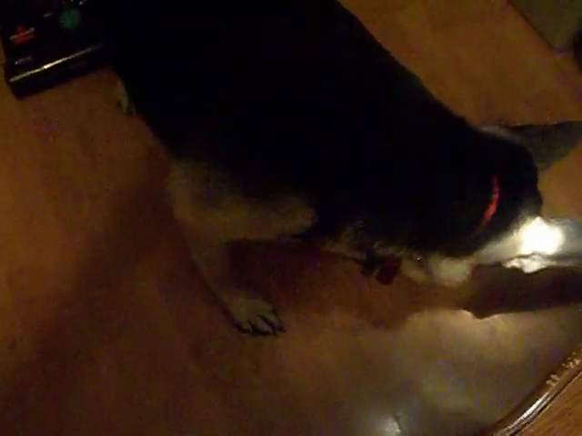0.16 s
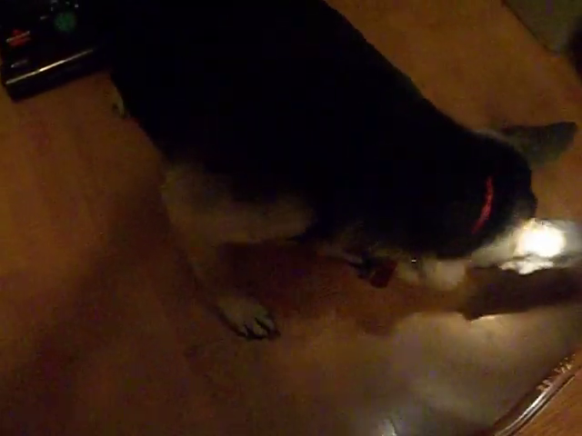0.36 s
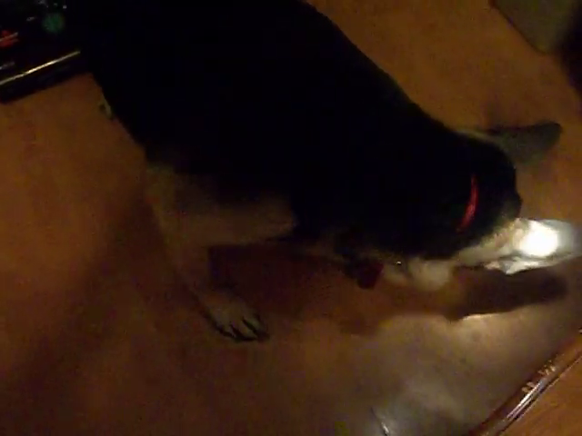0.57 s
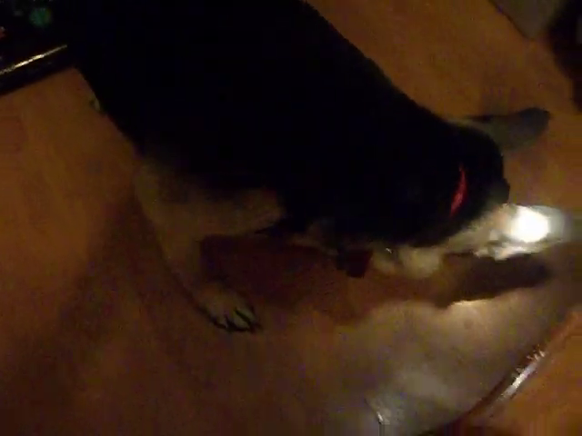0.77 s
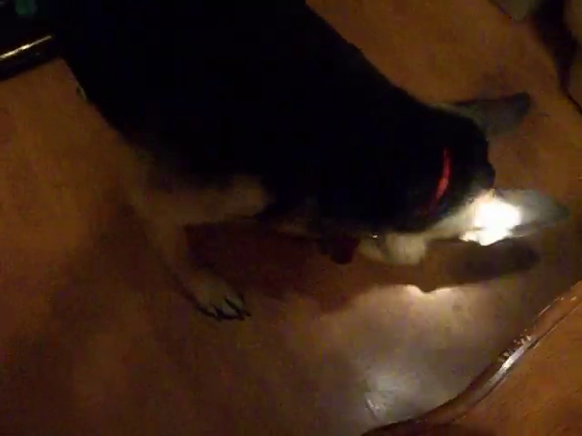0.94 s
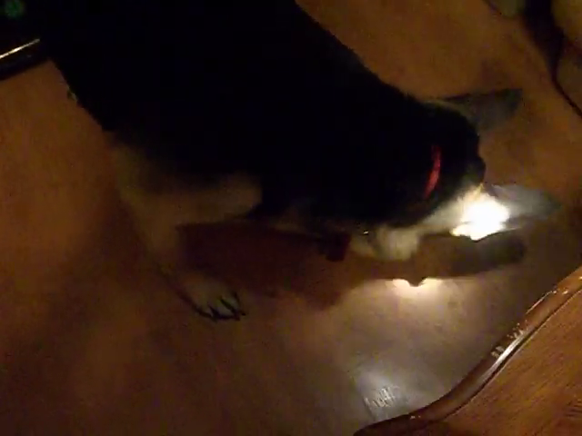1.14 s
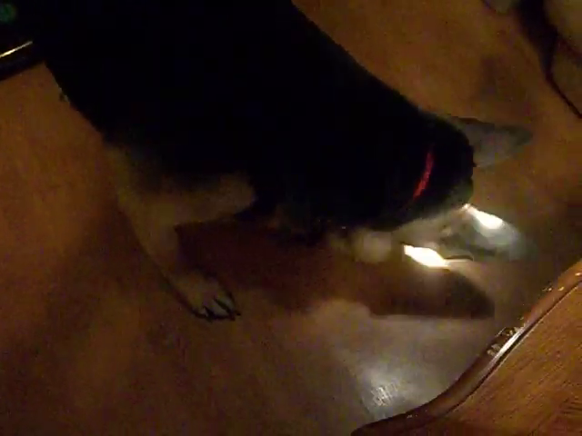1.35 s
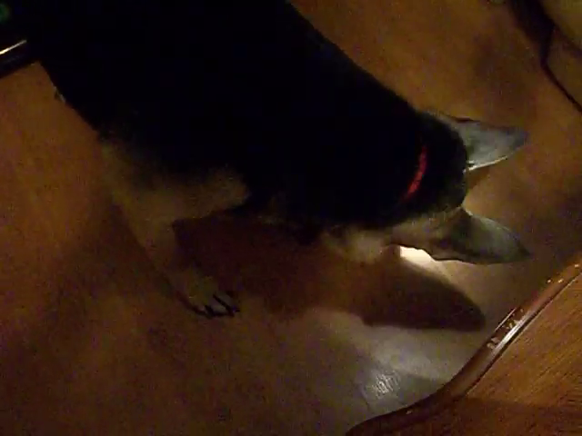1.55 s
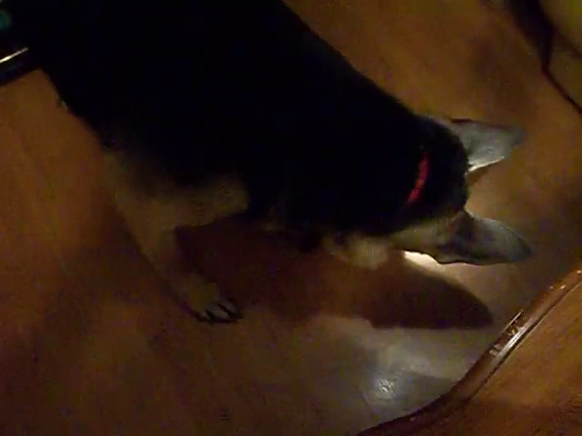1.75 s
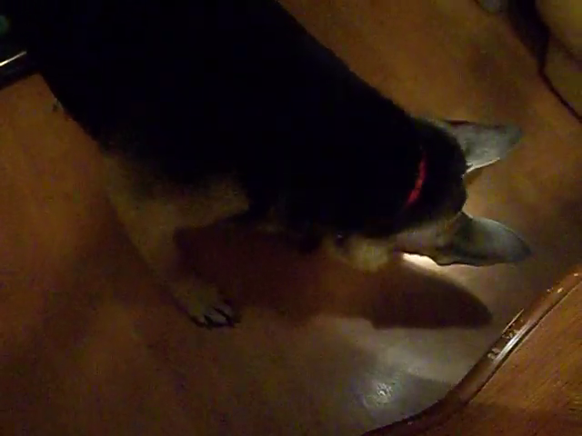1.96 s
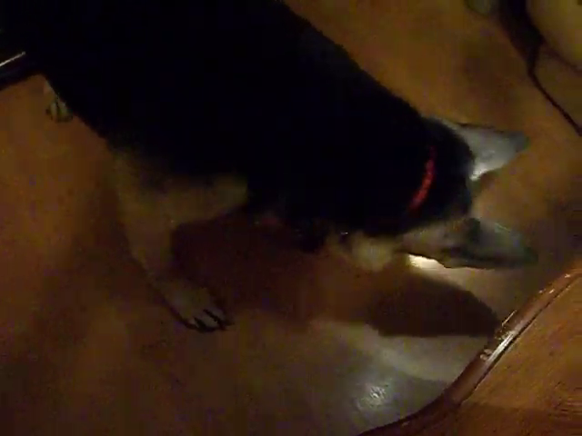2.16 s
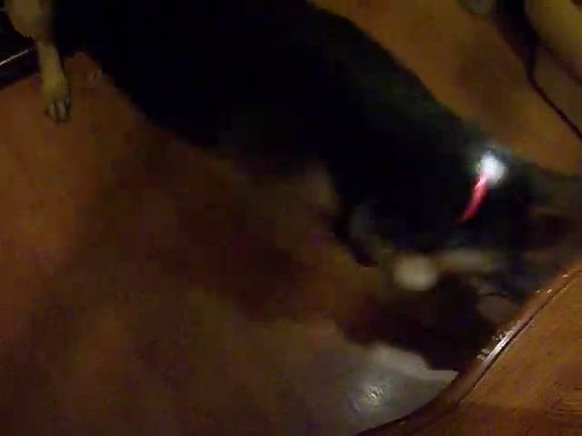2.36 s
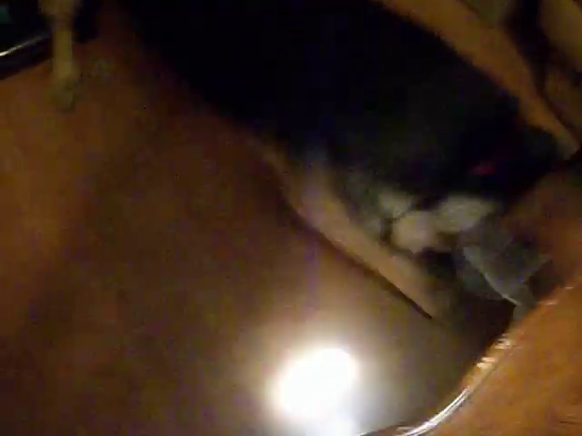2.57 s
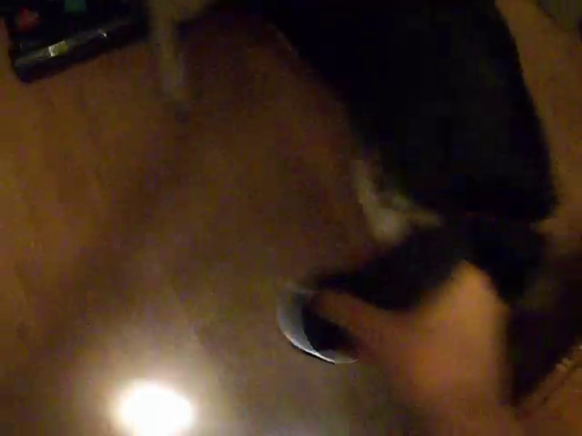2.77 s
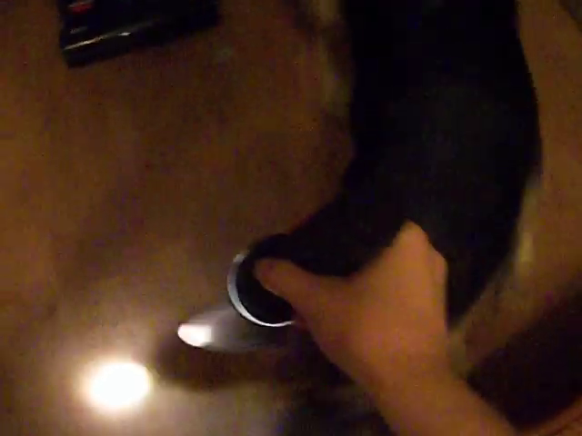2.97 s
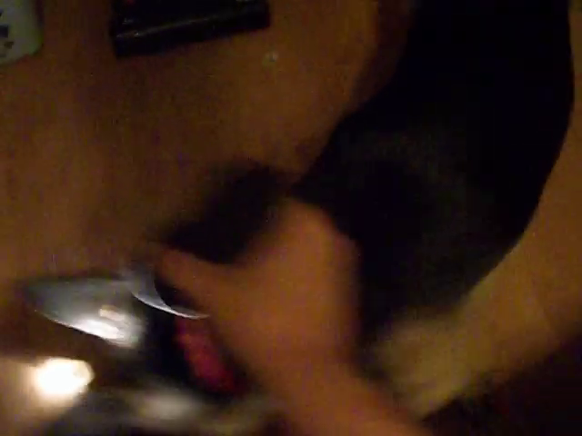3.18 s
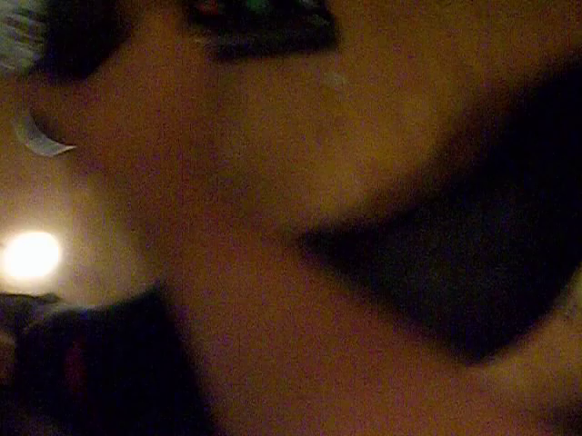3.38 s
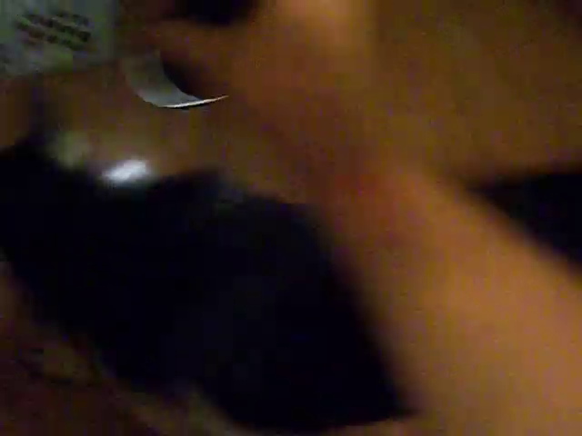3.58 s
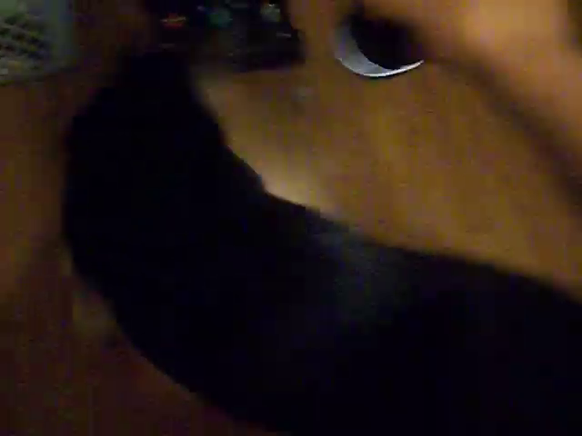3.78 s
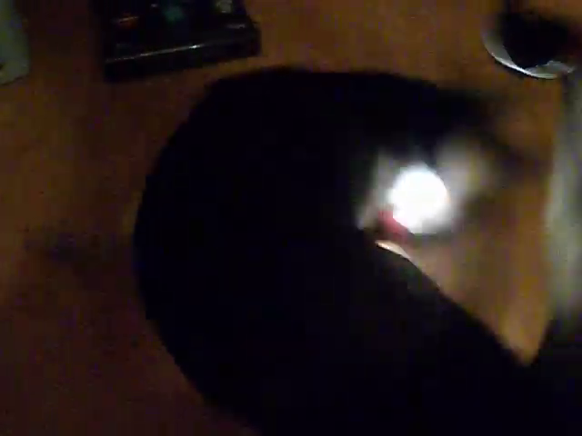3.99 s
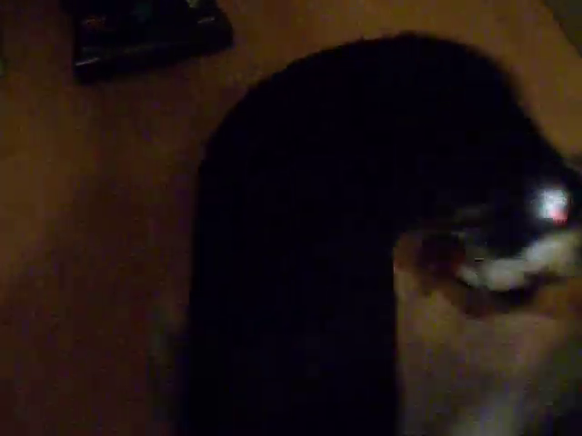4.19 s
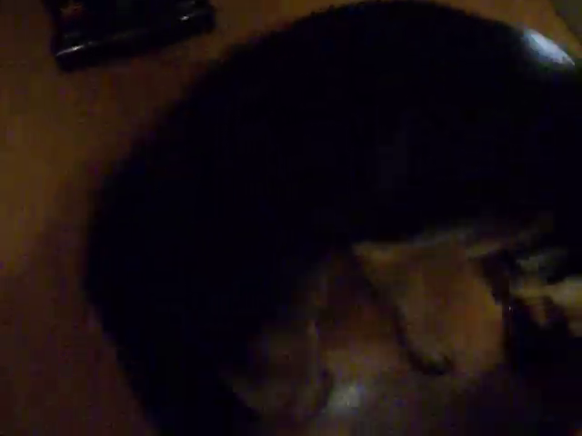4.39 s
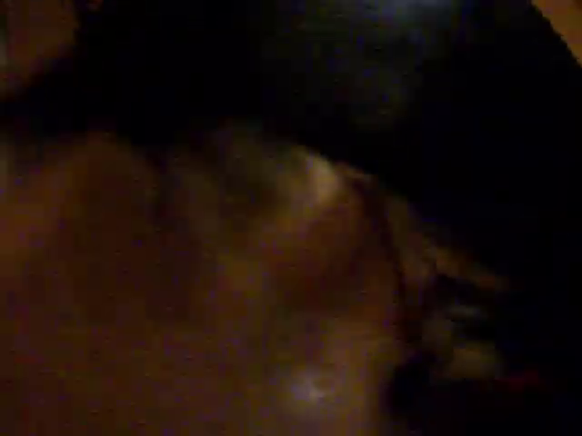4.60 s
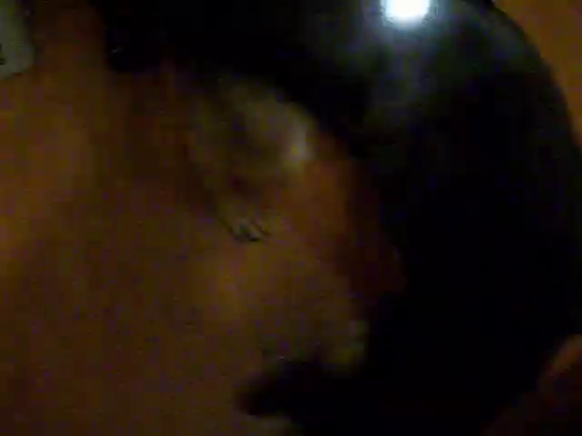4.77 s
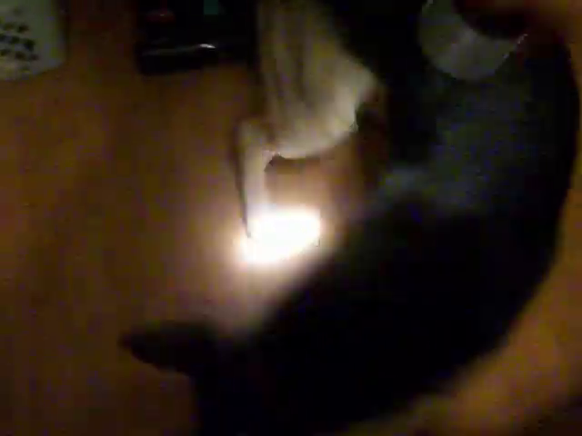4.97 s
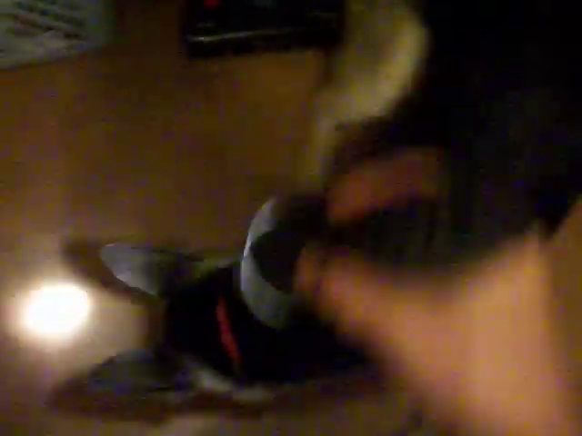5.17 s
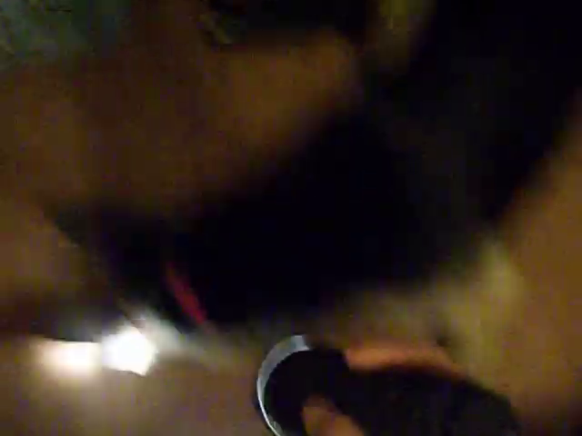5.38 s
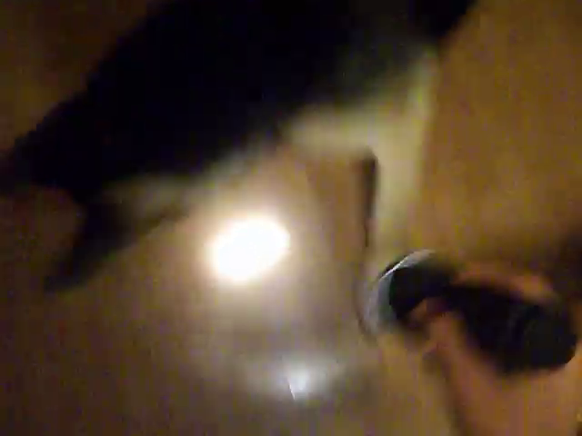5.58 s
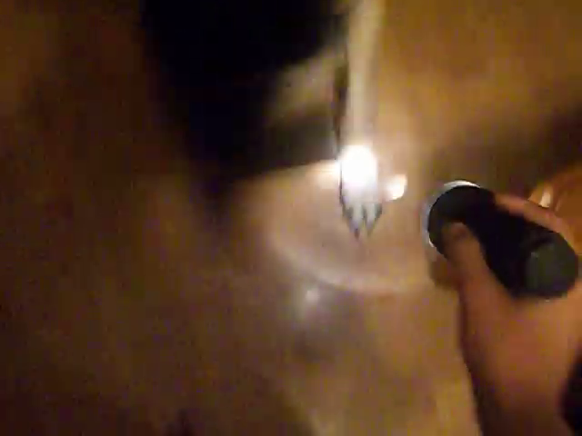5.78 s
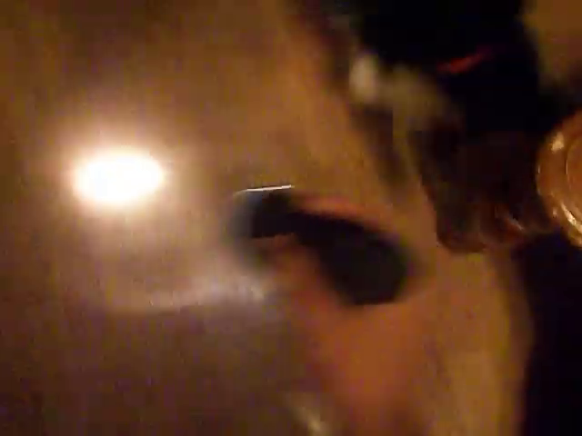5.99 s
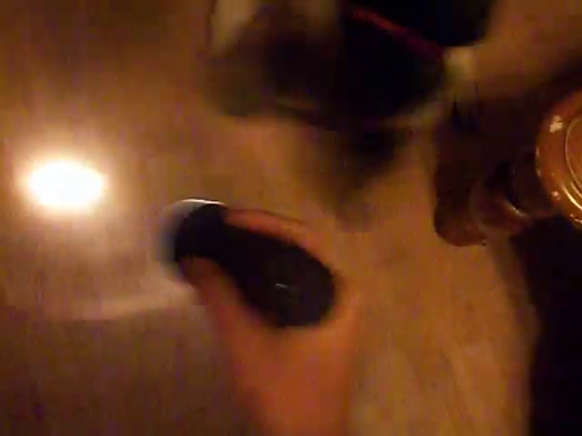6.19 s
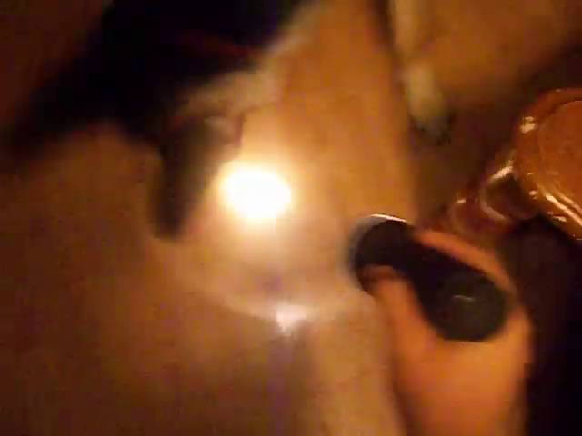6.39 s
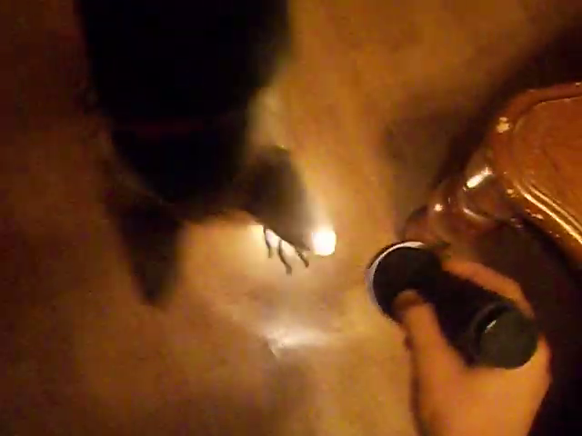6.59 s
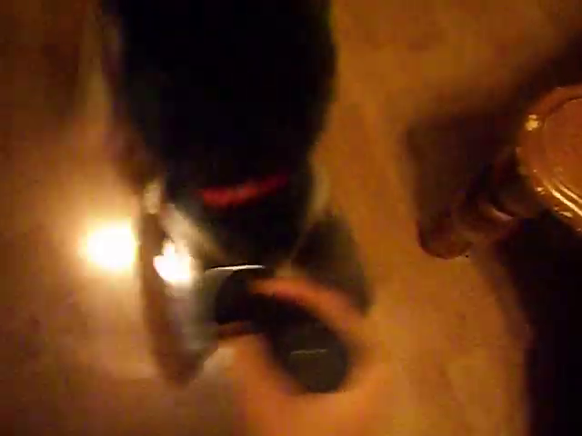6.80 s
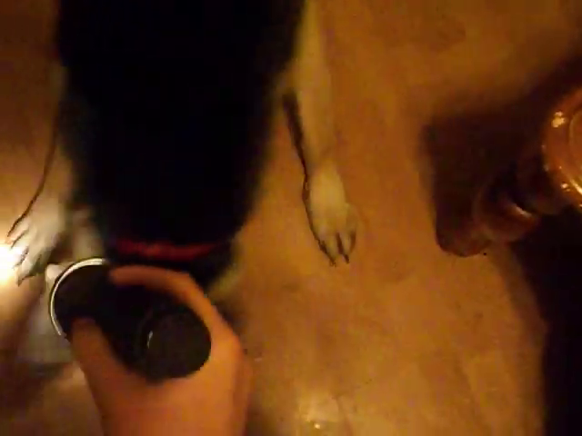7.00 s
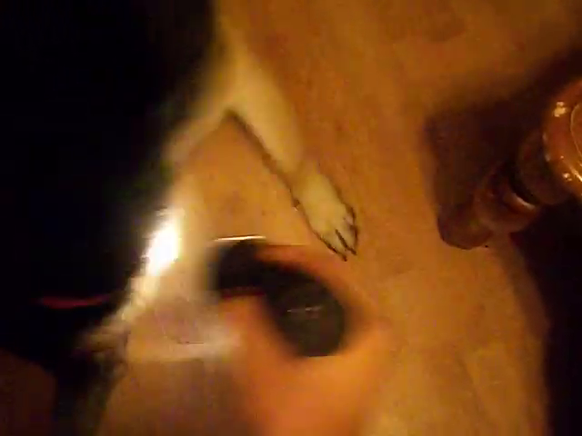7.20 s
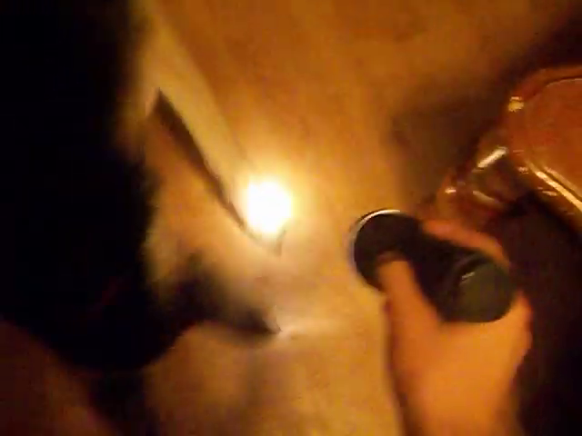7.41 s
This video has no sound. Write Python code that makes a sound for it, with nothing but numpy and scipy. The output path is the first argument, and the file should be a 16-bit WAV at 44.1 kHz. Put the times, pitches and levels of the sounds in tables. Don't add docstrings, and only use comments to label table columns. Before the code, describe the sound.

After two quiet seconds of low hum, a dog's claws and paws burst into thumping, clicking and skidding on a hardwood floor.

```python
import sys
import numpy as np
from scipy import signal
from scipy.fft import rfft, irfft, next_fast_len
from scipy.io import wavfile
from scipy.ndimage import uniform_filter1d

SR = 44100
rng = np.random.default_rng(int(sys.argv[2]) if len(sys.argv) > 2 else 0)


def invert_db(level):
    return 10 ** (np.asarray(level, dtype=float) / 20)


def wav_out(sig):
    wavfile.write(sys.argv[1], SR, np.round(np.clip(np.atleast_2d(sig).T, -1, 1) * 32767).astype(np.int16))


N = 328545

# (f/Hz, level/dB)
VARNISH = [(900, -16.5), (1400, -2.5), (2000, -8.5), (2600, 3), (3300, 0.5), (4300, -1), (5200, 0.5),
           (6500, -4.5)]


def evened(x):
    return x / np.sqrt(np.mean(x ** 2) + 1e-20)


def read(points, hz):
    f, value = np.transpose(points)
    return np.interp(np.log(hz + 1), np.log(f + 1), value)


def add(mix, s, sound):
    part = mix[round(s * SR):][:len(sound)]
    part += sound[:len(part)]


def resonate(x, hz, width):
    r = np.exp(-np.pi * width / SR)
    return 2 * signal.lfilter([1 - r], [1, -r * np.exp(2j * np.pi * hz / SR)], x).real


def coloured(x, points):
    size = next_fast_len(len(x))
    gain = invert_db(read(points, np.fft.rfftfreq(size, 1 / SR)))
    return irfft(rfft(x, size) * gain, size)[:len(x)]


def slips(count, per_s, spread_db):
    when, sign, size = rng.random((3, count))
    return (when < per_s / SR) * np.sign(sign - 0.5) * invert_db(-spread_db * np.log(size + 0.0011))


def stroke(t, rise, t60):
    build = np.minimum(t / max(rise, 0.0003), 1) ** 0.74
    return build * invert_db(-60 * np.maximum(t - rise, 0) / max(t60, 0.008))


def skid(db, hz, swell, fade):
    t = np.arange(-SR // 6, SR // 6) / SR
    clumps = evened(resonate(rng.standard_normal(len(t)), 0, 110))
    grit = slips(len(t), 1.4 * hz, 1.5) * invert_db(1.7 * clumps)
    share = 0.5 if hz > 1500 else 0.22
    band = resonate(resonate(grit, hz, share * hz), hz, 2 * share * hz)
    side_s = np.where(t < 0, max(swell, 0.003), max(fade, 0.003))
    return invert_db(db) * evened(band) * np.exp(-(t / side_s) ** 2)


def hum():
    motor = {12: -53, 13: -56, 14: -51, 15: -60.5, 16: -68, 20: -74, 26: -72.5}
    # (f/Hz, level/dB)
    rumble_colour = [(12, -11), (38, -3), (70, -10), (106, -11), (190, -20), (400, -24.5), (1000, -34.5),
                     (2500, -40.5), (5500, -40.5), (7000, -66)]
    # (f/Hz, width/Hz, level/dB)
    room_drone = [(37.5, 7.4, -53.5), (102.2, 7.9, -53.5)]
    shaft_hz, rumble_db = 18.42, -43.5
    t = np.arange(N) / SR
    lines = np.zeros(N)
    for order, db in motor.items():
        waver = evened(resonate(rng.standard_normal(N), 0, 1.2))
        lines += invert_db(db + 3.5 + waver) * np.sin(2 * np.pi * (order * shaft_hz * t + rng.random()))
    rumble = invert_db(rumble_db) * evened(coloured(rng.standard_normal(N), rumble_colour))
    drone = sum(invert_db(db) * evened(resonate(rng.standard_normal(N), f, w)) for f, w, db in room_drone)
    return lines + rumble + drone


def drag():
    # (t/s, effort/dB, claws over pads/dB)
    scuffle = [(2.201, -66, -13), (2.43, -38.5, 2.5), (2.62, -45, -0.5), (2.75, -33.5, 14),
               (2.86, -44.5, 2.5), (3.28, -46, -5.5), (3.5, -35.5, -1), (3.75, -50, 1), (4.1, -43.5, -6.5),
               (4.45, -37, 0.5), (4.93, -46.5, -8.5), (5.12, -41.5, -2.5), (5.35, -57, -2),
               (5.69, -48.5, -4), (6.08, -42.5, 3), (6.48, -57, -9), (7.03, -50.5, 9.5), (7.45, -58.5, -15)]
    # (f/Hz, width/Hz, level/dB)
    rub = [(850, 315, 13), (664, 210, 14), (1070, 110, -14.5)]
    # (f/Hz, width/Hz, level/dB)
    drag_body = [(110, 110, -11.5), (390, 264, -4.5), (470, 54, -6)]
    weight_db, weight_follows = -45.5, 0.44
    s, rub_db, claw_over_db = np.transpose(scuffle)
    claw_db = rub_db + claw_over_db
    body_db = weight_db + weight_follows * (rub_db + 44.0)
    t = np.arange(N) / SR
    claws = coloured(slips(N, 5000, 1.8), VARNISH)
    pads = sum(invert_db(db) * resonate(resonate(slips(N, 900, 1.8), f, w), f, 2 * w) for f, w, db in rub)
    body = sum(invert_db(db) * resonate(resonate(slips(N, 400, 4.7), f, w), f, w) for f, w, db in drag_body)
    out = np.zeros(N)
    # sound, level (dB), speed of its clumps (Hz), their depth (dB)
    for x, db, clump_hz, depth in ((claws, claw_db, 70, 2.5), (pads, rub_db, 50, 2.6), (body, body_db, 30, 2.4)):
        clumps = evened(resonate(rng.standard_normal(N), 0, clump_hz))
        out += evened(x) * invert_db(np.interp(t, s, db, left=-120) + depth * np.tanh(clumps))
    return out


def tick(db, hz, length, rise, strike_db):
    # (f/Hz, width/Hz, level/dB)
    claw_ring = [(2020, 1100, -12.5), (4580, 670, -2), (3150, 3200, -14.5)]
    t = np.arange(SR // 5) / SR
    chatter = np.append(np.zeros(60), slips(len(t), 6000, 1.81) * stroke(t, rise, 0.91 * length))
    strike_at = 60 + round(0.31 * max(rise, 0) * SR)
    strike = signal.unit_impulse(len(chatter), strike_at) * invert_db(strike_db + 11.5)
    tones = claw_ring + [(hz, 600, -2)]
    ring = sum(invert_db(tone_db) * resonate(resonate(strike, f, w), f, 2 * w) for f, w, tone_db in tones)
    sound = 0.63 * coloured(chatter, VARNISH) + 2.0 * resonate(chatter, hz, 1100) + ring
    return invert_db(db + 7) * sound / abs(sound).max()


def nails():
    # (t/s, peak/dB, claw f/Hz, skid length/s)
    scratches = [(2.2474, -20, 5080, 0.13), (2.316, -22.5, 4400, 0.037), (2.383, -24, 2840, 0.059),
                 (2.4, -8.5, 4580, 0.11), (2.4887, -6.5, 4364, 0.13), (2.672, -29, 3950, 0.12),
                 (2.782, 8.5, 3744, 0.099), (2.902, -15.5, 4160, 0.13), (3.019, -10, 5430, 0.075),
                 (3.156, -23.5, 4420, 0.14), (3.319, -23, 4580, 0.079), (3.437, -29, 4350, 0.16),
                 (3.475, -26.5, 3600, 0.32), (3.517, -13, 4190, 0.18), (3.674, -21, 5190, 0.18),
                 (3.8555, -28.5, 2520, 0.13), (3.8838, -5, 4100, 0.14), (3.985, -25, 2150, 0.38),
                 (4.115, -25.5, 2830, 0.15), (4.4045, -6, 3440, 0.13), (4.473, -21, 4870, 0.21),
                 (4.505, -15, 4720, 0.049), (4.769, -19, 4450, 0.19), (5.061, -22, 3180, 0.18),
                 (5.093, -19.5, 4440, 0.08), (5.221, -15, 4580, .13), (6.674, -16, 4350, 0.12),
                 (6.7385, -18.5, 4540, 0.087), (6.913, -23.5, 3000, 0.13)]
    # (t/s, peak/dB, claw f/Hz, skid length/s, click over chatter/dB)
    clicks = [(3.917, -4, 4690, 0.084, -1), (4.086, -30.5, 2580, 0.26, 7.5), (4.129, -20, 4310, 0.11, 4.5),
              (4.304, -8.5, 3520, 0.072, -6), (4.564, -10, 4820, 0.12, 1),
              (4.905, -25.5, 4040, 0.076, -2.5), (5.03, -9, 4350, 0.12, 10.5),
              (5.526, -27.5, 2600, 0.12, 16.5), (5.824, -13.5, 4320, 0.015, 17),
              (5.834, -17, 2380, 0.071, 23.5), (5.8845, -33, 2100, 0.47, 1),
              (5.925, -12.5, 4300, 0.023, 17), (6.062, -24, 4680, 0.033, 18),
              (6.0892, -15, 4400, 0.069, 15), (6.226, -33.5, 3800, 0.23, 8.5), (6.46, -38.5, 4610, 0.17, 5),
              (6.5, -18, 2020, 0.036, 11.5), (6.523, -30, 2170, 0.086, 25.5), (7.35, -20, 4300, 0.02, 12.5),
              (7.425, -17.5, 1900, 0.11, 23.5)]
    # (t/s, peak/dB, claw f/Hz)
    grazes = [(3.187, -45.5, 4170), (3.365, -31.5, 3150), (3.8364, -33.5, 3000), (4.2078, -34, 4980),
              (4.731, -30, 4670), (4.927, -34, 4100), (4.957, -33.5, 4650), (5.005, -36, 4830),
              (5.4716, -41.5, 3000), (5.498, -44.5, 2520), (5.621, -35.5, 2960), (5.681, -36.5, 2670),
              (6.474, -31, 4370), (6.667, -30, 4200), (6.876, -37, 3190), (7.264, -39.5, 4200),
              (7.294, -48, 3240), (7.371, -42.5, 2240), (7.39, -42, 4230), (7.42, -28, 4300)]
    # (peak t/s, level/dB, swell/s, fade/s)
    claw_slides = [(2.327, -30, 0.036, 0.014), (2.445, -25.5, 0.0057, 0.023), (2.712, -21, 0.037, 0.014),
                   (2.754, -14, 0.039, 0.063), (2.973, -19.5, 0.044, 0.018), (3.205, -29.5, 0.015, 0.018),
                   (3.409, -30, 0.036, .011), (3.486, -34.5, 0.011, 0.017), (3.559, -25, 0.021, 0.0061),
                   (3.73, -36, 0.03, 0.015), (3.944, -17, 0.042, .02), (4.011, -33, 0.012, 0.037),
                   (4.348, -31, 0.015, 0.015), (4.432, -23, .021, 0.0084), (4.768, -30.5, 0.0099, 0.037),
                   (5.682, -43.5, 0.08, 0.067), (6.039, -36.5, 0.052, 0.045), (6.179, -36.5, 0.049, 0.033),
                   (6.55, -48, 0.012, 0.013), (7.04, -37, 0.031, 0.031)]
    scratch_rise_s, scratch_strike_db, click_rise_s = 0.004, 2.5, 0.0013
    graze_s, graze_rise_s, graze_strike_db = 0.16, 0.0035, -0.5
    strikes = [row + (scratch_rise_s, scratch_strike_db) for row in scratches]
    strikes += [row[:4] + (click_rise_s, row[4]) for row in clicks]
    strikes += [row + (graze_s, graze_rise_s, graze_strike_db) for row in grazes]
    claws = np.zeros(N)
    for s, *row in strikes:
        add(claws, s - 35 / SR, tick(*row))
    for s, db, swell, fade in claw_slides:
        add(claws, s - 1 / 6, skid(db, 4260, swell, fade))
    return claws


def thump(db, hz, t60, rise):
    # (f/Hz, width/Hz, level/dB)
    neighbours = [(370, 49, 1), (550, 160, 7), (820, 160, 5.5), (970, 94, -30.5)]
    rattle_db = -3.5
    t = np.arange(SR // 5) / SR
    push = slips(len(t), 1500, 3.3) * stroke(t, rise, t60)
    push[round(max(rise, 0) * SR / 2)] += 2.5
    ring = resonate(resonate(push, hz, 0.25 * hz), hz, 2.2 * hz)
    for f, w, board_db in neighbours:
        ring = ring + invert_db(board_db - 14.0) * resonate(resonate(push, f, w), f, 3 * w)
    return invert_db(db + rattle_db) * ring / abs(ring).max()


def paws():
    # (t/s, peak/dB, board f/Hz, ring t60/s)
    landings = [(2.249, -17.5, 890, 0.13), (2.402, -13, 590, 0.091), (2.4872, 6, 500, 0.067),
                (2.7797, 4.5, 786, 0.12), (2.901, -15, 850, 0.12), (3.018, -21, 795, 0.054),
                (3.366, -13, 430, 0.23), (3.388, -17.5, 534, 0.049), (3.513, -15, 470, 0.41),
                (3.797, -22.5, 703, 0.16), (3.887, 1, 346, 0.13), (3.989, -15, 317, 0.11),
                (4.004, -13.5, 296, 0.16), (4.118, -11, 593, 0.11), (4.302, -5, 514, 0.028),
                (4.404, -8.5, 610, 0.057), (4.561, -14, 476, 0.055), (4.652, -25.5, 650, 0.17),
                (4.731, -19, 645, 0.33), (4.786, -17.5, 380, 0.17), (4.904, -11.5, 443, 0.13),
                (5.029, -3.5, 690, 0.062), (5.218, -17, 402, 0.14), (5.822, -27.5, 840, 0.17),
                (5.924, -18, 880, 0.022), (6.089, -28, 860, 0.072), (6.474, -13, 388, 0.082),
                (6.67, -18, 776, 0.4), (6.737, -21, 850, 0.12), (7.161, -17.5, 723, 0.083)]
    # (t/s, peak/dB, board f/Hz)
    toe_steps = [(2.376, -33, 450), (2.607, -22.5, 770), (2.682, -29.5, 829), (3.211, -23, 695),
                 (3.257, -26, 466), (3.318, -30, 645), (3.47, -23.5, 640), (3.671, -22.5, 544),
                 (3.712, -26, 560), (3.84, -20.5, 664), (4.263, -18, 283), (4.609, -23, 675),
                 (4.702, -20, 773), (4.865, -27, 675), (5.002, -29.5, 435), (5.29, -27.5, 440),
                 (5.325, -32, 437), (5.526, -27, 580), (5.585, -26.5, 790), (6.935, -21, 387),
                 (7.025, -31, 363), (7.123, -19.5, 696)]
    # (t/s, peak/dB, board f/Hz)
    taps_of_toe = [
        (5.904, -27, 620),
        (5.943, -35.5, 415),
        (5.97, -34.5, 810),
        (6.198, -28, 850),
        (6.215, -28, 850),
        (6.237, -22.5, 880),
        (7.349, -26, 870),
        (7.423, -19.5, 840),
    ]
    # (peak t/s, level/dB, f/Hz, length/s)
    shoves = [(2.494, -9, 553, 0.0067), (2.595, -30, 129.7, 0.01), (2.731, -25, 850, 0.049),
              (2.789, -4.5, 534, 0.005), (3.158, -39, 274, 0.058), (3.392, -37, 116, 0.021),
              (3.52, -25.5, 158, 0.01), (3.896, -27, 110, 0.021), (3.917, -22.5, 370, 0.011),
              (3.987, -35, 2150, 0.014), (4.016, -24.5, 785, 0.03), (4.021, -31.5, 110, 0.034),
              (4.051, -32.5, 420, 0.018), (4.138, -33.5, 319, 0.034), (4.15, -37.5, 165, 0.064),
              (4.918, -38, 414, 0.0098), (5.237, -30, 390, 0.0084), (6.24, -39, 850, 0.04),
              (6.486, -37, 126, 0.024), (6.5, -33, 835, 0.03), (6.994, -38, 210, 0.04),
              (7.01, -28.5, 850, 0.073), (7.041, -23, 386, 0.015), (7.101, -38, 374, 0.03),
              (7.044, -31.5, 2140, 0.072), (6.122, -40.5, 1950, 0.16), (5.824, -26.5, 1600, 0.0041),
              (6.335, -48, 1670, 0.042), (3.39, -29, 170, 0.022), (6.58, -42.5, 99, 0.038)]
    # (f/Hz, level/dB)
    planks = [(60, -3), (980, 0), (1250, -1), (2500, -13.5), (20000, -61.5)]
    landing_rise_s, step_rise_s = 0.003087, 0.0033
    step_t60_s, tap_t60_s = 0.18, 0.049
    boards = np.zeros(N)
    for s, *row in landings:
        add(boards, s + 0.00072, thump(*row, landing_rise_s))
    for s, *row in toe_steps:
        add(boards, s + 0.0011, thump(*row, step_t60_s, step_rise_s))
    for s, *row in taps_of_toe:
        add(boards, s, thump(*row, tap_t60_s, step_rise_s))
    for s, db, hz, length in shoves:
        add(boards, s - 1 / 6, skid(db, hz, length, 1.2 * length))
    return coloured(boards, planks)


def blow(db, hz, length):
    sag, softness = 0.018, 1.69
    t = np.arange(-SR // 50, SR // 10) / SR
    u = np.maximum(1 + 1.61 * t / max(length, 0.001), 0)
    swell = (u * np.exp(1 - u)) ** softness
    return invert_db(db) * swell * np.sin(2 * np.pi * hz * t * (1 - sag * np.tanh(u - 1) / 2))


def blows():
    # (peak t/s, peak/dB, board f/Hz, length/s)
    toe_blows = [(2.2513, -16.5, 940, 0.0021), (2.293, -26.5, 530, 0.0022), (2.379, -30, 455, 0.005),
                 (2.4026, -18, 1124, 0.004), (2.4141, -18, 550, 0.0062), (2.4917, -1, 482, 0.005),
                 (2.518, -15, 534, 0.0073), (2.62, -35.5, 790, 0.0047), (2.685, -32, 890, 0.005),
                 (2.73, -27, 880, 0.004), (2.7463, -22.5, 860, 0.005), (2.7563, -16, 970, 0.0022),
                 (2.7657, -15.5, 743, 0.0037), (2.7807, 0, 788, 0.0036), (2.8137, -21, 820, 0.0031),
                 (2.903, -15.5, 850, 0.0027), (2.915, -19, 850, 0.0027), (3.0217, -18.5, 826, 0.0036),
                 (3.124, -28, 730, 0.0027), (3.152, -27.5, 274, 0.0035), (3.1654, -28.5, 690, 0.0039),
                 (3.2154, -29, 658, 0.0037), (3.267, -25.5, 516, 0.0027), (3.322, -31, 676, 0.003),
                 (3.3709, -12, 442, 0.0045), (3.392, -6, 507, 0.0034), (3.4076, -18, 600, 0.0034),
                 (3.441, -29, 910, 0.0034), (3.475, -24, 627, 0.0039), (3.4884, -24, 740, 0.0043),
                 (3.5215, -15, 450, 0.0094), (3.548, -25, 500, 0.0054), (3.7125, -28, 560, 0.0042),
                 (3.799, -21.5, 780, 0.0032), (3.8925, 0.5, 343, 0.006), (3.912, -11.5, 405, 0.0056),
                 (3.9167, -11.5, 935, 0.0019), (3.9407, -20, 360, 0.0055), (3.988, -24, 800, 0.0023),
                 (4.0058, -8.5, 378, 0.0022), (4.0134, -10.5, 436, 0.0034), (4.0286, -14.5, 300, 0.0051),
                 (4.035, -15, 514, 0.0029), (4.116, -17.5, 545, 0.002), (4.134, -21, 330, 0.0056),
                 (4.2629, -22.5, 517, 0.0014), (4.2663, -31, 370, 0.0024), (4.3053, -18, 477, 0.0045),
                  (4.3083, -18.5, 734, 0.0019), (4.4054, -17, 567, 0.0023), (4.42, -20, 910, 0.0034),
                  (4.429, -18, 620, 0.0033), (4.496, -22.5, 790, 0.0017), (4.505, -25.5, 1040, 0.0025),
                  (4.5625, -25, 447, 0.0041), (4.657, -22.5, 700, 0.0057), (4.789, -14.5, 398, 0.0048),
                  (4.9079, -19, 743, 0.0077), (4.9129, -12, 397, 0.0034), (4.9203, -19.5, 446, 0.0059),
                  (5.034, -7.5, 723, 0.0052), (5.067, -26, 870, 0.0034), (5.098, -21.5, 810, 0.0014),
                  (5.221, -14.5, 444, 0.0047), (5.234, -23, 450, 0.0047), (5.245, -20.5, 386, 0.0048),
                  (5.332, -28, 414, 0.0056), (5.528, -30, 544, 0.0044), (5.826, -21.5, 850, 0.0035),
                  (5.906, -29, 390, 0.0049), (5.926, -26, 910, 0.0043), (6.0906, -24.5, 907, 0.0054),
                  (6.201, -25, 880, 0.0033), (6.218, -19, 820, 0.0021), (6.2385, -26, 830, 0.0015),
                  (6.4805, -17.5, 392, 0.0091), (6.495, -28, 850, 0.0021), (6.652, -35, 800, 0.0022),
                  (6.678, -19.5, 780, 0.003), (6.691, -24, 790, 0.0045), (6.74, -23.5, 835, 0.0039),
                  (7.0275, -22, 867, 0.016), (7.0292, -23, 370, 0.028), (7.127, -30, 610, 0.0033),
                  (7.163, -20, 770, 0.0013), (7.353, -29, 930, 0.0022), (7.423, -30, 840, 0.0028)]
    # (peak t/s, peak/dB, f/Hz, length/s)
    further_blows = [(2.4943, -10, 438, .004), (2.501, -16, 450, 0.0077), (2.4915, -13, 272, 0.0058),
                     (2.786, -5.5, 560, 0.0031), (2.7925, -3, 754, 0.0049), (3.5145, -13.5, 467, 0.0024),
                     (7.044, -20.5, 378, 0.02), (7.05, -28, 860, 0.0069), (3.898, -33, 90.4, 0.022),
                     (4.025, -26.5, 99, 0.023), (6.49, -31.5, 93, 0.019)]
    # (peak t/s, peak/dB, claw f/Hz)
    catches = [(2.4023, -24, 2920), (2.405, -12.5, 4430), (2.4177, -16, 4420), (2.4891, -10, 3024),
               (2.4934, -17.5, 4270), (2.7103, -20, 4100), (2.7435, -18.5, 2584), (2.751, -19, 1687),
               (2.7512, -4, 4150), (2.7557, -9.5, 3270), (2.7714, -20, 3550), (2.7822, -1.5, 2450),
               (2.7864, -9.5, 3810), (2.7895, 2.5, 1826), (3.0222, -17.5, 2690), (3.5245, -14.5, 4240),
               (3.532, -18.5, 3100), (3.537, -21, 4100), (3.732, -27, 2850), (3.989, -22.5, 2100),
               (3.8882, -11.5, 2970), (3.8929, -17, 3960), (3.9218, -19.5, 3280), (3.9226, -21, 4520),
               (4.3084, -24, 3560), (4.409, -20.5, 2940), (4.4137, -12.5, 4400), (4.424, -17.5, 2680),
               (4.43, -14.5, 3760), (4.477, -25.5, 4750), (4.486, -24.5, 4440), (5.032, -17.5, 2840),
               (5.0343, -13.5, 4050), (5.8253, -18.5, 4400), (5.8259, -18.5, 2260), (5.9273, -20.5, 4400),
               (6.5024, -29, 1820)]
    # (peak t/s, level/dB, f/Hz, swell/s, fade/s)
    grinds = [
        (2.759, -29, 1926, 0.044, 0.0087),
        (6.995, -38, 2400, 0.036, 0.061),
        (5.69, -44.5, 2600, 0.03, 0.04),
        (5.79, -51.5, 1800, 0.03, 0.034),
        (3, -30, 560, 0.021, 0.007),
    ]
    catch_s = 0.0017
    out = np.zeros(N)
    for s, *row in toe_blows + further_blows:
        add(out, s - 1 / 50, blow(*row))
    for s, db, hz in catches:
        add(out, s - 1 / 50, blow(db + 1.0, hz, catch_s))
    for s, *row in grinds:
        add(out, s - 1 / 6, skid(*row))
    return out


def room(x):
    # (f/Hz, t60/s)
    echo_t60 = [(200, 0.1), (800, 0.16), (2500, 0.2), (6000, 0.15)]
    taps = np.zeros(SR // 2)
    at = np.arange(200, len(taps) - 20, 20)
    taps[at + rng.integers(0, 20, len(at))] = rng.choice([-1., 1.], len(at))
    hz, t, z = signal.stft(taps, SR, nperseg=256)
    decay = invert_db(-60 * t / read(echo_t60, hz)[:, None])
    tail = signal.istft(z * decay, SR, nperseg=256)[1]
    return signal.fftconvolve(x, tail / np.linalg.norm(tail))[:N]


def scene():
    dog = drag() + nails() + paws() + blows()
    mono = hum() + dog + invert_db(-15.5) * room(dog)
    return np.array([mono, mono])


def roll_off(x):
    return signal.sosfilt(signal.butter(12, 16000, fs=SR, output="sos"), x)


def record(dry):
    # (f/Hz, level/dB)
    band_edge = [(10, 0), (5650, 0), (6000, -2), (6350, -11), (6700, -20), (7000, -32), (8000, -80),
                 (22000, -100)]
    # (f/Hz, level/dB)
    top_band = [(10, -120), (5700, -120), (5790, 0), (22000, 0)]
    x = dry[0]
    power_db = 10 * np.log10(abs(uniform_filter1d(x ** 2, 600, origin=250)) + 1e-12)
    fall = np.arange(N) * 50.7 / SR
    held_db = np.maximum.accumulate(power_db + fall) - fall
    over_db = np.maximum(held_db + 8.5, 0)
    x = x / invert_db(1.226 * uniform_filter1d(over_db, 400, origin=199))
    x = coloured(np.clip(x, -1.035, 1.035), band_edge)
    top = coloured(x, top_band)
    now = uniform_filter1d(top ** 2, 900)
    before = uniform_filter1d(top ** 2, 4001, origin=1500)
    x = x - top * uniform_filter1d(1. * (now < invert_db(3) * before), 64)
    size = next_fast_len(N)
    hz = np.fft.rfftfreq(size, 1 / SR)
    late = irfft(rfft(x, size) * np.exp(-2j * np.pi * hz * 3.75 / SR), size)[:N]
    return roll_off(np.clip([late, x], -1, 1))


dry = scene()
out = record(dry)
wav_out(out)
```